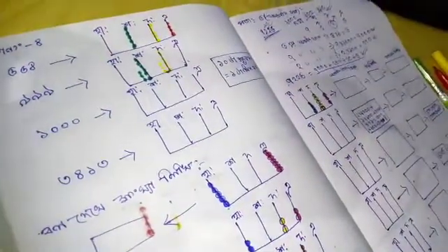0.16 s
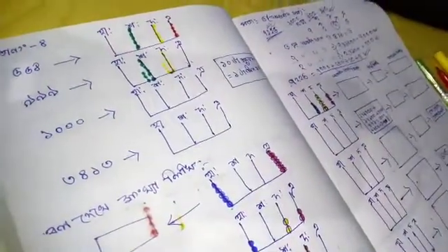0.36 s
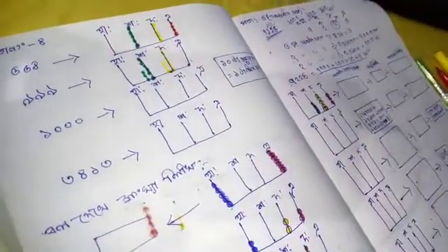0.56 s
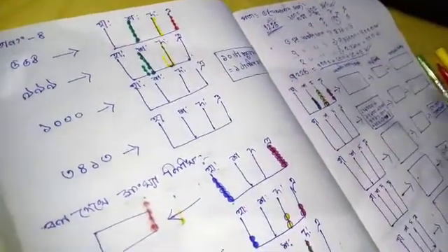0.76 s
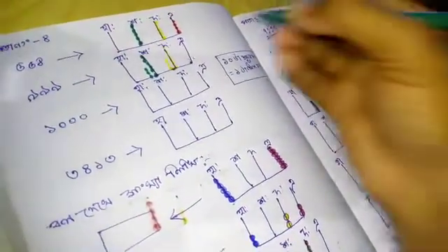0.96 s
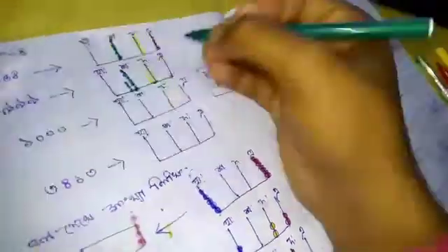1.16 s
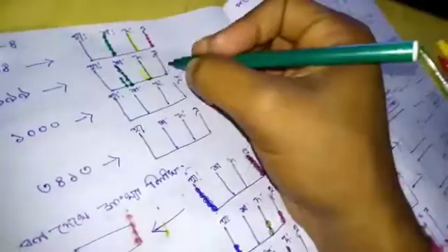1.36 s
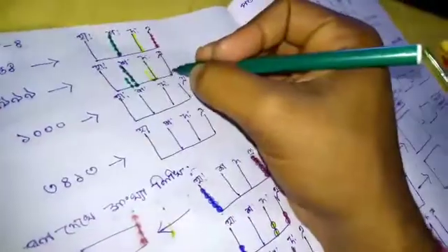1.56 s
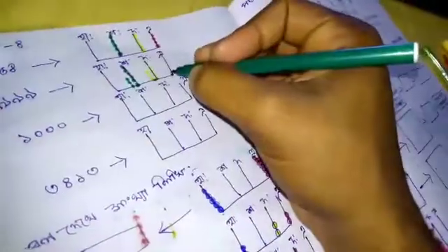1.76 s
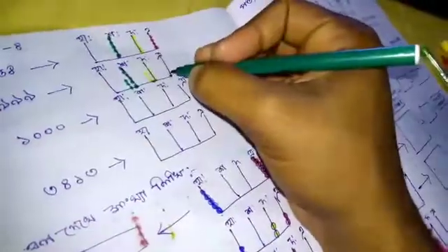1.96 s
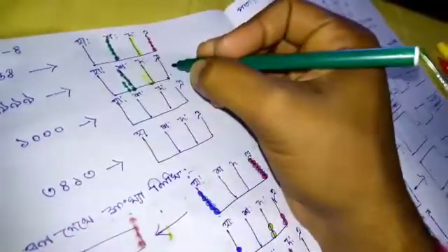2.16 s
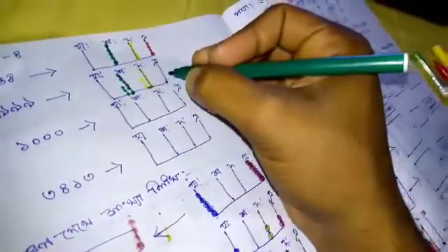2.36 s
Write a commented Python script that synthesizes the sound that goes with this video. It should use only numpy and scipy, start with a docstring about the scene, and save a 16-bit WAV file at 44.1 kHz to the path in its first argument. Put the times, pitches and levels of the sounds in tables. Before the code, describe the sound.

Hard plastic pen clatter and short rattle on a desktop, then soft hand and tip touches on paper

```python
"""Pens clattering on a desk

A plastic felt-tip pen is dropped among other pens in a small room: its barrel and the desk ring as
short damped tones with cracks of noise, and loose pens rattle. Shaped noise makes a hand sliding over
a notebook and settling on it; then the tip of a held pen taps the page, again as damped tones.
Behind it are a low rumble with hiss, a weak steady hum, and dull thuds and faint gliding whistles
made from narrow noise. The sound is nearly mono."""
import sys
import numpy as np
from scipy import signal
from scipy.fft import rfft, irfft
from scipy.io import wavfile
from scipy.ndimage import uniform_filter1d

SR = 44100
rng = np.random.default_rng(int(sys.argv[2]) if len(sys.argv) > 2 else 0)


def generate_wav(sig):
    """Save sig (samples, or channels by samples) to the path in sys.argv[1] as 16-bit PCM at SR."""
    pcm = np.round(np.clip(np.atleast_2d(sig).T, -1, 1) * 32767).astype(np.int16)
    wavfile.write(sys.argv[1], SR, pcm)


N = 105840  # length of the scene [samples]

# colour of the room rumble and hiss: (frequency [Hz], level [dB per Hz])
AIR_COLOUR = [(20, -28), (45, -22.5), (65, -8.5), (110, -10), (160, -2), (225, 1), (350, -4.5),
              (470, -12.5), (900, -15), (1300, -14), (2200, -15.5), (3700, -22.5), (6000, -28), (8000, -34),
              (12600, -36.5), (14000, -53)]
# faint high whistles:
# (start [s], length [s], first pitch [Hz], last pitch [Hz], width [Hz], level [dB])
WHISTLES = [(0.015, 0.16, 5910, 5540, 1170, -65.5), (0.032, 0.12, 7370, 7370, 500, -77.5),
            (0, 0.062, 3440, 3410, 500, -74), (.462, 0.079, 5850, 5740, 128, -68.5),
            (.51, 0.096, 5840, 5880, 200, -77.5), (0.426, 0.39, 2665, 2664, 600, -66.5),
            (0.484, 0.299, 2965, 3055, 240, -66.5), (0.617, 0.011, 2833, 2750, 700, -61),
            (0.722, 0.42, 2750, 3126, 376.5, -67.5), (0.757, 0.42, 2407, 2330, 380, -67),
            (0.723, 0.11, 4740, 4500, 160.6, -78.5), (0.843, 0.13, 4290, 4240, 160, -74.5),
            (0.957, 0.19, 6200, 6470, 1000, -77), (1.021, 0.15, 2577, 2730, 560, -56.5),
            (1.131, 0.2, 2650, 2706, 301, -66), (1.284, 0.15, 2080, 2114, 294, -60.5),
            (1.424, 0.094, 2665, 2680, 215, -60.5), (1.644, 0.15, 1435, 1744, 200, -73),
            (1.759, 0.043, 5500, 5340, 110, -78.5), (1.82, 0.16, 2050, 1800, 382, -70.5),
            (1.847, .22, 5760, 5800, 108.7, -71), (2.092, 0.13, 2900, 3070, 513, -65),
            (2.133, 0.192, 4660, 4700, 191.4, -70), (2.24, 0.096, 3200, 2940, 1000, -62.5),
            (2.237, 0.054, 5670, 5670, 354, -68), (2.248, 0.14, 4370, 4300, 315, -67.5)]
# dull low thuds: (start [s], length [s], pitch [Hz], level [dB])
THUDS = [(.21, 0.035, 220, -59.5), (.29, .11, 219.8, -57.5), (0.568, 0.077, 234.3, -60),
         (0.793, 0.071, 258.7, -63.5), (.92, 0.3, 199.8, -68), (1.161, 0.079, 332.6, -65.5),
         (1.269, 0.098, 88, -67), (1.53, 0.097, 210, -55.5), (1.62, 0.33, 191, -70),
         (1.83, 0.066, 239.6, -56.5), (1.92, 0.064, 236, -61), (2.11, 0.071, 219, -57.5)]
# how long the room's tail takes to fall by 60 dB: (frequency [Hz], time [s])
ROOM_DECAY = [(200, 0.47), (1200, 0.2), (3800, 0.32), (7000, 0.15), (13000, 0.23)]
# colour of the room's tail: (frequency [Hz], level [dB])
ROOM_COLOUR = [(100, 4.5), (750, -5.5), (1300, 6), (2400, -8), (3200, -8), (3850, 9.5), (4600, -6),
               (6300, 1.5), (7600, 0.5), (9600, -2.5), (12500, 2)]
# near reflections: (delay [s], level [dB])
ECHOES = [(.0031, -14), (.0056, -26.5), (.0072, -54), (.0156, -31), (.0168, -27), (.0203, -22.5)]
# skin slides on paper: (start [s], length [s], level [dB], treble change [dB])
HAND_SLIDES = [(0.174, 0.026, -56.5, -4), (1.213, 0.074, -64, 6.5), (1.249, .06, -56.5, -19),
               (1.285, 0.06, -63.5, -12), (1.341, .1, -72.5, 11), (1.44, 0.067, -62.5, 0),
               (2.24, 0.14, -75.5, -3)]
# colour of the sliding: (frequency [Hz], level [dB])
SLIDE_COLOUR = [(100, -21.5), (900, -7.5), (1800, -3), (3000, -0.5), (4300, -3), (5500, 2), (8000, -7),
                (10000, -5), (13000, -22.5)]
# the hand settles on the notebook:
# (start [s], rise [s], decay [s], level [dB], treble change [dB])
HAND_PATS = [(1.505, 0.012, 0.039, -49.5, 9.5), (1.529, 0.0059, 0.026, -49, -18)]
# colour of the settling: (frequency [Hz], level [dB])
PAT_COLOUR = [(60, -4), (200, 1.5), (420, -10.5), (700, 0), (900, -3), (1100, 5), (1400, 7), (1900, -4),
              (3800, -8.5), (6300, -18), (8000, -31), (13000, -41)]
# colour of the contact noise of all pens: (frequency [Hz], level [dB])
CRACK_COLOUR = [(30, -15), (100, -19.5), (200, -4.5), (450, 3.5), (850, -8.5), (2000, 10), (6000, 1.5),
                (10000, 3), (14000, -15.5)]
# the tip touches the page: (time [s], level [dB], bass change [dB], treble change [dB])
TIP_TAPS = [(1.6978, -61.5, 11.5, -20), (1.7482, -42.5, -1.5, -22), (1.7494, -36, 2, -34.5)]
# tones of the held pen: (frequency [Hz], width [Hz], level [dB])
HELD_PEN_MODES = [(1667, 200, 4), (2300, 190, -3.5), (3110, 140, 2), (3960, 120, -9.5), (4480, 190, -6),
                  (6810, 1300, -26)]
# loose pens chatter after a blow: (start [s], length [s], level [dB])
RATTLES = [(0.222, .08, -36.5), (0.31, .065, -35.5)]
# a pen knocks on the desk: (time [s], level [dB], bass change [dB], treble change [dB])
DESK_LANDINGS = [(.1810, -47.5, 2, 11), (.3065, -20.5, 6, -1.5), (.3077, -27.5, 0, -1),
                 (.3103, -28.5, 10, -14), (.3262, -37, 15, -15)]
# tones of pen and desk top: (frequency [Hz], width [Hz], level [dB])
DESK_MODES = [(1200, 99, 5), (1440, 78, -0.5), (1800, 190, -7.5), (2290, 180, -13), (3480, 280, -3.5),
              (4720, 300, -0.5), (6350, 130, 4), (8050, 400, -24), (10400, 430, -26)]
# barrel against barrel: (time [s], level [dB], bass change [dB], treble change [dB])
BARREL_CLICKS = [(.2005, -24.5, 8, -7), (.2040, -29, 3, -4.5), (.2076, -29.5, 16.5, -10),
                 (.2153, -21, -19.5, -3), (.2159, -7, 2.5, 1), (.2171, -16, 6, -5.5),
                 (.2857, -30.5, 7, 7.5), (.3506, -22.5, 6, -34), (.3530, -30.5, -2, -16)]
# tones of the barrels: (frequency [Hz], width [Hz], level [dB])
BARREL_MODES = [(1300, 790, -19), (2400, 550, 0), (3260, 880, 1), (4160, 1300, -2.5), (5060, 470, -1.5),
                (6074, 150, -1), (7800, 700, -10), (8130, 300, -9.5), (9500, 550, -6), (10590, 270, -19),
                (12700, 460, -20)]

AIR_DB, HUM_HZ, HUM_DB = -65.5, 120.4, -77
WHISTLE_ROUNDNESS = .7
WAVER = 0.0043  # typical pitch waver of the whistles, as a share of the pitch
THUD_WIDTH_HZ = 70
ROOM_DB, ROOM_GAP_S = -5.5, .002  # strength of the tail and the wait before it
SCATTER = 2.8  # the room hears the barrels from all sides, so their tones blend: widths times this
GRAIN_DB = 1.5  # unevenness of the sliding
BASS_HZ, TREBLE_HZ = 1500, 6000  # corners of the tone controls
CRACK_DB, CRACK_S = -16.5, .0012  # noise level against the ring's peak, and its decay time
RING_CUT_HZ = 1800  # a thin pen radiates little below this
RATTLE_PER_S, RATTLE_FADE_DB = 420, -12  # contacts each second; level change from start to end
RATTLE_SPREAD_DB = 6.5  # random level, up or down
RATTLE_DETUNE = .25  # the loose pens ring at different pitches: up to this share up or down
RUMBLE_CUT_HZ = 52
WIDTH_DB, WIDTH_HZ = -27, 5000  # the channels differ slightly in level, mainly above this
OVERLOAD = 0.93  # the microphone bends peaks so that they stay below this
EDGE_HZ = 13150  # upper limit of the recorder


def amp(db):
    """Turns decibels into a gain."""
    return 10 ** (np.asarray(db) / 20)


def unit(x):
    """Scales a sound to an average (rms) level of 1."""
    return x / np.sqrt(np.mean(x ** 2) + 1e-20)


def read(points, hz):
    """Reads a table of (frequency, value) along a logarithmic frequency axis."""
    f, value = np.transpose(points)
    return np.interp(np.log(hz + 1), np.log(f + 1), value)


def add(mix, start_s, sound):
    """Adds a sound into the mix from its start time, cutting off what runs past the end."""
    part = mix[max(round(start_s * SR), 0):][:len(sound)]
    part += sound[:len(part)]


def noise(colour, size):
    """Makes noise of rms 1 with the given colour."""
    hz = np.fft.rfftfreq(size, 1 / SR)
    spectrum = rfft(rng.standard_normal(size)) * amp(read(colour, hz))
    return unit(irfft(spectrum, size))


def highpass(x, hz):
    """Weakens what lies below hz."""
    return signal.lfilter(*signal.butter(2, hz, "high", fs=SR), x)


def shelves(x, bass_db, treble_db):
    """Raises or lowers the bass, then the treble."""
    low = signal.lfilter(*signal.butter(1, BASS_HZ, fs=SR), x)
    x = x + (amp(bass_db) - 1) * low
    high = signal.lfilter(*signal.butter(1, TREBLE_HZ, "high", fs=SR), x)
    return x + (amp(treble_db) - 1) * high


def swell(size, roundness):
    """A rounded rise and a slightly slower fall; a small roundness gives a flat top."""
    return np.sin(np.pi * np.linspace(0, 1, size) ** 0.82).clip(0) ** abs(roundness)


def band(hz, width_hz):
    """Narrow noise of rms 1 that follows a pitch curve."""
    z = rng.standard_normal(SR) + 1j * rng.standard_normal(SR)
    offset_hz = np.fft.fftfreq(SR, 1 / SR)
    z = np.fft.ifft(np.fft.fft(z) / (1 + (2 * offset_hz / width_hz) ** 4))[:len(hz)]
    carrier = np.exp(2j * np.pi * np.cumsum(hz) / SR)  # moves the noise up to the wanted pitch
    return unit((z * carrier).real)


def grainy(size, depth_db):
    """Quick unevenness of friction, a few milliseconds a grain."""
    grains = unit(uniform_filter1d(rng.standard_normal(size), size=90))
    return unit(amp(abs(depth_db) * grains))


def patchy(x, depth_db):
    """Lets the level drift unevenly from one patch of time and frequency to the next."""
    z = signal.stft(x, nperseg=512, noverlap=384)[2]
    across_pitch = uniform_filter1d(rng.standard_normal(z.shape), size=7, axis=0)
    field = uniform_filter1d(across_pitch, size=14, axis=1)
    uneven = signal.istft(z * amp(depth_db * unit(field)), nperseg=512, noverlap=384)[1]
    return unit(uneven[:len(x)])


def background():
    """Room rumble and hiss are coloured noise; the weak mains hum is one steady tone."""
    air = patchy(noise(AIR_COLOUR, N), depth_db=1.9)
    hum = unit(np.sin(2 * np.pi * HUM_HZ * np.arange(N) / SR))
    return amp(AIR_DB) * air + amp(HUM_DB) * hum


def whistles():
    """Faint fuzzy whistles: narrow noise that glides and wavers in pitch."""
    out = np.zeros(N)
    for start, length, first_hz, last_hz, width_hz, db in WHISTLES:
        n = int(length * SR)
        waver = unit(uniform_filter1d(rng.standard_normal(SR), size=1500))[:n]
        pitch = np.linspace(first_hz, last_hz, n) * (1 + WAVER * waver)
        add(out, start, amp(db) * swell(n, WHISTLE_ROUNDNESS) * band(pitch, width_hz))
    return out


def thuds():
    """Soft, dull booms: narrow low noise that swells and fades."""
    out = np.zeros(N)
    for start, length, hz, db in THUDS:
        n = int(length * SR)
        boom = band(np.full(n, hz), THUD_WIDTH_HZ)
        add(out, start, amp(db) * swell(n, roundness=0.77) * boom)
    return out


def room(x):
    """Walls return a few near reflections and a short diffuse tail, which fades at its own pace by pitch."""
    hz, t, z = signal.stft(noise(ROOM_COLOUR, SR // 2), SR, nperseg=256)
    fade = amp(-60 * t / read(ROOM_DECAY, hz)[:, None])
    tail = signal.istft(z * fade, SR, nperseg=256)[1]
    response = np.zeros(SR // 2)
    add(response, ROOM_GAP_S, amp(ROOM_DB) * tail / np.linalg.norm(tail))
    for delay, db in ECHOES:
        add(response, delay, amp([db]))
    return signal.fftconvolve(x, response)[:N]


def hand():
    """Skin rubs across paper as grainy noise, then the hand comes down with a soft rustle."""
    out, t = np.zeros(N), np.arange(SR // 4) / SR
    for start, length, db, treble_db in HAND_SLIDES:
        n = int(length * SR)
        paper = patchy(noise(SLIDE_COLOUR, len(t)), depth_db=2.0)
        rub = (paper * grainy(len(t), GRAIN_DB))[:n]
        add(out, start, amp(db) * swell(n, roundness=0.31) * shelves(rub, 0, treble_db))
    for start, rise, decay, db, treble_db in HAND_PATS:
        shape = np.minimum(t / rise, 1) * np.exp(-np.maximum(t - rise, 0) / decay)
        rustle = noise(PAT_COLOUR, len(t)) * grainy(len(t), depth_db=1.0)
        add(out, start, amp(db) * shape * shelves(rustle, 0, treble_db))
    return out


def strikes(contacts, modes):
    """Each contact gives a crack of noise and rings the quickly damped tones (modes) of the plastic."""
    t, out = np.arange(SR // 20) / SR, np.zeros(N)
    ring = np.zeros(len(t))
    for k, (hz, width, db) in enumerate(modes):
        # a wider mode dies sooner; the factor width keeps the peak of its spectrum at the table's level
        strength = (-1) ** k * amp(db) * width
        ring += strength * np.exp(-np.pi * width * t) * np.sin(2 * np.pi * hz * t)
    ring = highpass(ring, RING_CUT_HZ)
    ring = ring / abs(ring).max()
    for start, db, bass_db, treble_db in contacts:
        crack = amp(CRACK_DB) * noise(CRACK_COLOUR, len(t)) * np.exp(-t / CRACK_S)
        add(out, start, amp(db) * shelves(ring + crack, bass_db, treble_db))
    return out


def tip_taps():
    """The tip touches the page and rings the held pen."""
    return strikes(TIP_TAPS, HELD_PEN_MODES)


def rattle():
    """Tiny random contacts between different pens, dying away as they come to rest."""
    out = np.zeros(N)
    for start, length, db in RATTLES:
        count = int(length * RATTLE_PER_S)
        for k, (jitter, strength, pitch) in enumerate(rng.random((count, 3))):
            place = (k + jitter) / count  # 0 at the start of the rattle, 1 at its end
            detune = 1 + RATTLE_DETUNE * (2 * pitch - 1)
            modes = [(hz * detune, width, level) for hz, width, level in BARREL_MODES]
            contact_db = db + RATTLE_FADE_DB * place + RATTLE_SPREAD_DB * (2 * strength - 1)
            out += strikes([(start + place * length, contact_db, 0, 0)], modes)
    return shelves(out, bass_db=-3.5, treble_db=-5)


def desk_knocks():
    """A pen hits the desk, and pen and desk top ring together."""
    return strikes(DESK_LANDINGS, DESK_MODES)


def barrel_clicks(widening):
    """Barrel hits barrel; widening the modes makes them blend and die sooner."""
    modes = [(hz, width * widening, db) for hz, width, db in BARREL_MODES]
    return strikes(BARREL_CLICKS, modes)


def scene():
    """Mixes all sources in the room, nearly mono."""
    behind = background() + whistles() + thuds()
    tip = tip_taps()
    knocks = desk_knocks() + rattle()
    near = highpass(barrel_clicks(widening=1) + knocks, RUMBLE_CUT_HZ)
    # what the room hears of the drop
    around = highpass(amp(1.0) * barrel_clicks(SCATTER) + knocks, RUMBLE_CUT_HZ)
    mono = behind + room(around + amp(-3) * tip) + hand() + tip + near
    side = amp(WIDTH_DB) * highpass(mono, WIDTH_HZ)
    return np.array([mono + side, mono - side])


def record(dry):
    """The microphone softly flattens strong peaks; then the recorder cuts off the highest treble."""
    soft = OVERLOAD * np.tanh(dry / OVERLOAD)
    band_limit = signal.firwin(255, EDGE_HZ, window=("kaiser", 8), fs=SR)
    return signal.oaconvolve(soft, band_limit[None], "same")


dry = scene()
out = record(dry)
generate_wav(out)
```